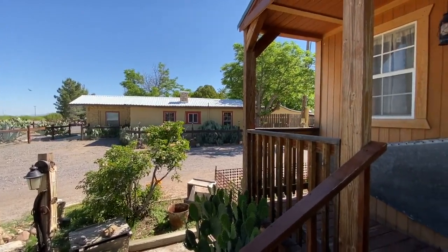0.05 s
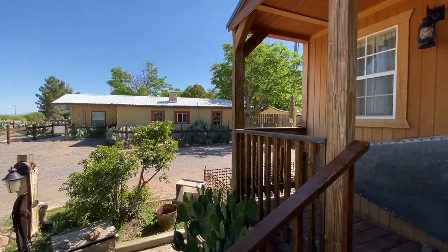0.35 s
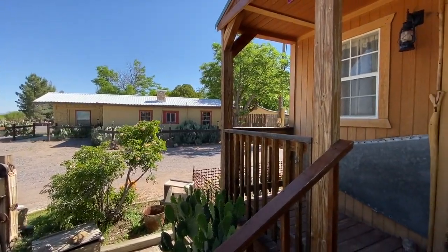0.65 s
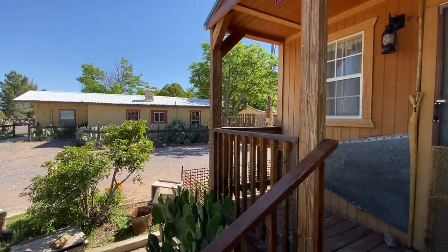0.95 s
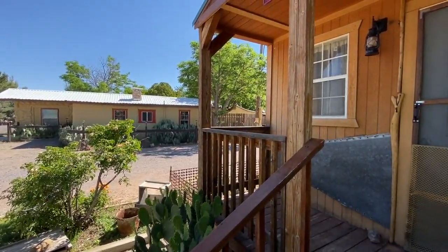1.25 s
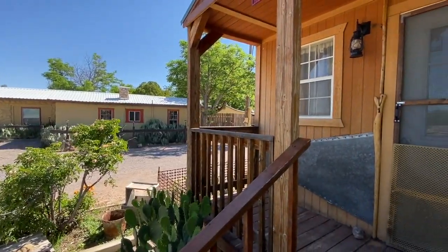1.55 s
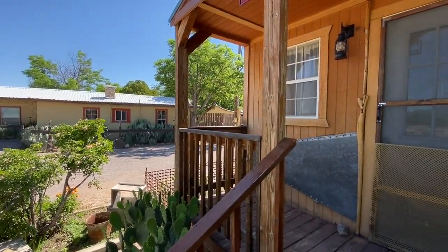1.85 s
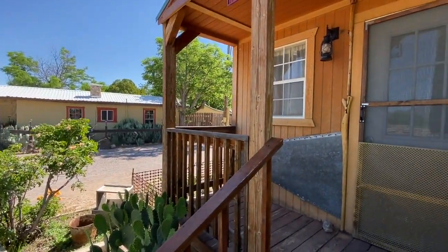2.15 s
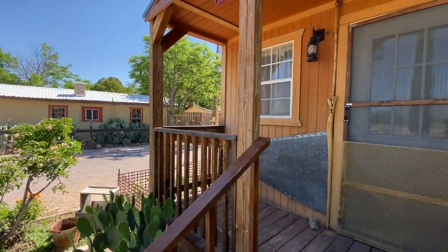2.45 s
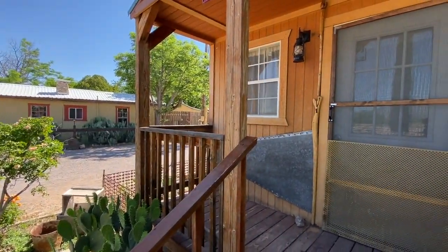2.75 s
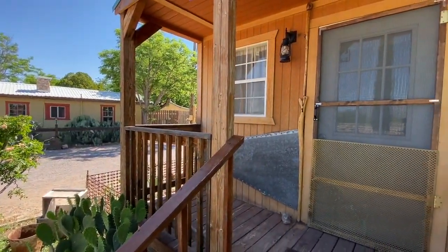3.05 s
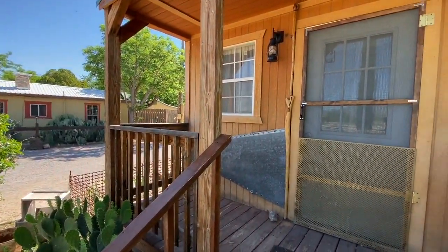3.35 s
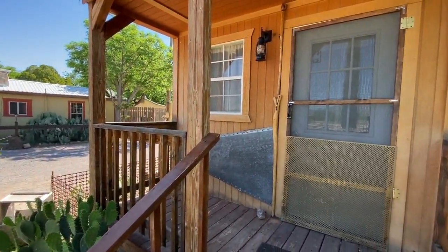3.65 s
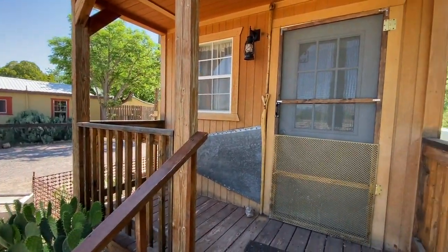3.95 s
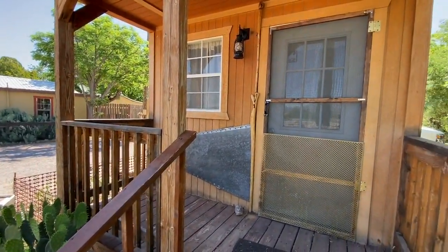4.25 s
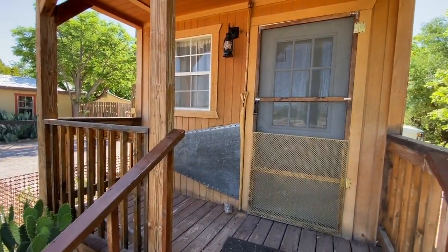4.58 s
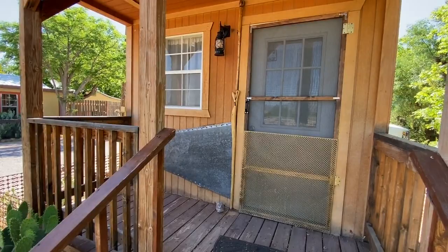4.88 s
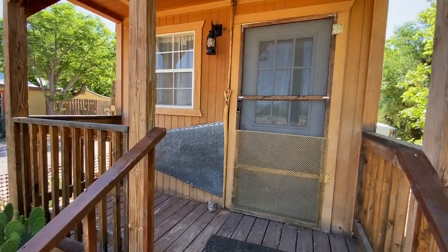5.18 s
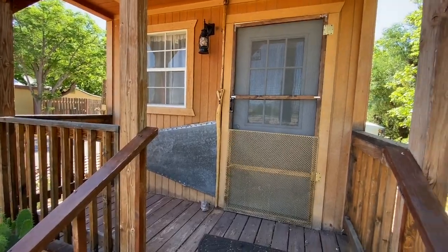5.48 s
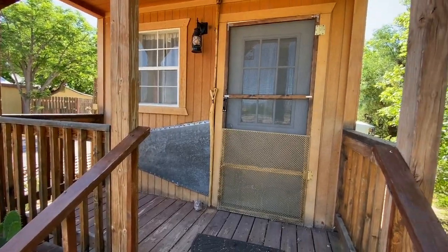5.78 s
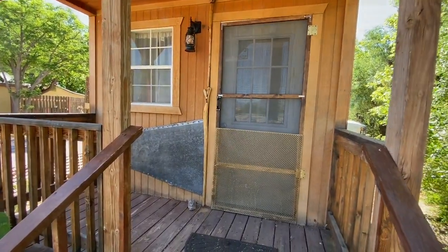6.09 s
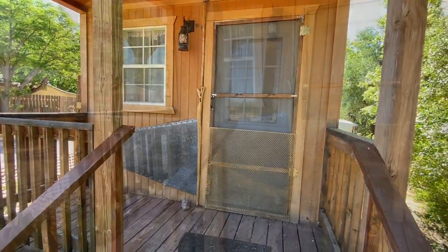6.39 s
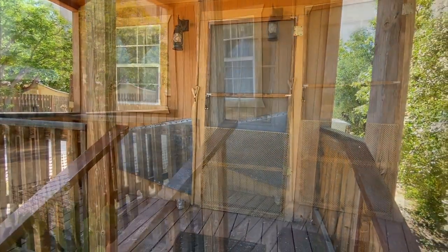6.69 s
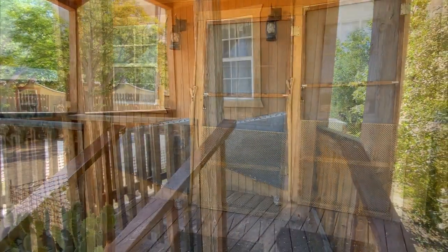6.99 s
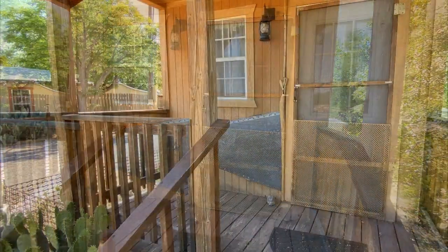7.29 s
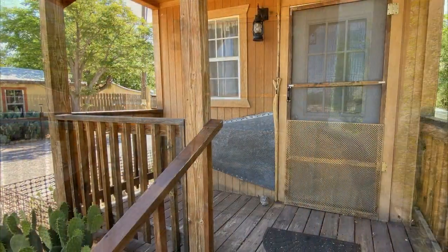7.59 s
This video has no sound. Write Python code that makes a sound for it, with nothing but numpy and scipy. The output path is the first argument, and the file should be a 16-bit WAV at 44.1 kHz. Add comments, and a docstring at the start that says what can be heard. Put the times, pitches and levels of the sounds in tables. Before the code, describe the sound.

Many small birds chirp outdoors above a soft low rumble, with a raspy chatter joining later before everything fades.

```python
"""Sparrows chirp and twitter in the bushes beside a wooden porch; one breaks into a dry scolding chatter.
Each note is a trilled syrinx tone on a pitch arch, echoed by porch, trees and walls. The scold is a
hoarse harmonic voice shaped by throat and beak. A dove coos far off, a light breeze rumbles on the
microphone over a dull outdoor murmur with a faint electric hum, and the scene fades away."""
import sys
import numpy as np
from scipy import signal
from scipy.io import wavfile

SR = 44100
rng = np.random.default_rng(int(sys.argv[2]) if len(sys.argv) > 2 else 0)


def unload_wav(signal):
    """Save mono or channel-first audio to the path in sys.argv[1] as 16-bit WAV at rate SR, clipped to [-1, 1]."""
    wavfile.write(
        sys.argv[1],
        SR,
        np.round(np.clip(np.atleast_2d(signal).T, -1, 1) * 32767).astype(np.int16),
    )


N = 340880
TIME_S = np.arange(N) / SR

# Table levels are relative; each source adds its own gain.
# nearest sparrow: t/s, f/Hz, main note/dB, closing note/dB, lisp/dB, buzz depth/ratio,
# second voice/dB re main note
NEAR_CHIRPS = [(0.56, 4955, -41, -51, -50.5, 0.053, -12), (1.161, 4820, -44.5, -51, -50, 0.052, -5),
               (1.94, 4764, -42.5, -52, -49.5, 0.032, -8), (2.656, 4790, -41, -47.5, -52, .11, -4),
               (3.189, 5020, -44.5, -54, -50.5, 0.029, -7), (3.831, 4804, -48, -54.5, -55.5, 0.081, -8),
               (4.372, 4840, -48.5, -56.5, -54, 0.045, -6.5), (5.04, 5080, -48, -59.5, -60.5, .06, -13),
               (5.954, 5080, -52, -58.5, -60, 0.05, -4)]
# flock calls: centre t/s, f/Hz, level/dB
CHEEP_CALLS = [(.028, 4930, -48.5), (.122, 3980, -55.5), (.265, 4660, -52.5), (.305, 5850, -53),
               (.347, 5810, -53.5), (.495, 5070, -49), (.76, 4840, -58.5), (1.03, 5070, -54.5),
               (1.375, 3330, -54.5), (1.547, 5180, -51), (1.75, 4590, -49), (2.215, 5640, -51),
               (2.315, 5150, -54.5), (2.378, 5260, -54.5), (2.487, 4970, -60.5), (2.555, 3400, -70),
               (2.858, 5380, -56.5), (3.578, 3445, -59.5), (3.76, 5400, -57), (3.825, 5790, -52),
               (4.165, 5140, -62.5), (4.97, 5570, -58.5), (5.205, 4950, -57.5), (5.29, 4160, -69),
               (5.53, 5560, -60), (5.585, 5600, -58.5), (6.11, 4600, -60), (6.17, 4400, -58.5),
               (6.48, 5210, -58.5), (6.578, 4630, -61), (6.7, 4706, -52.5), (6.773, 5030, -56),
               (6.955, 5560, -58.5), (6.995, 5650, -59), (7.105, 4970, -54), (7.262, 4000, -66)]  # hooked, up and down
TSIP_CALLS = [(0.934, 4840, -53), (1.454, 4926, -44.5), (1.885, 4830, -51.5), (3.404, 5180, -56.5),
              (3.655, 4860, -52), (5.764, 4710, -56), (6.244, 4560, -57.5)]  # thin lisp, then a sweep up to a held note
FALL_CALLS = [(0.374, 3160, -54), (.542, 3520, -50.5), (1.477, 2555, -62.5), (1.705, 6020, -49.5),
              (1.73, 4650, -54.5), (1.787, 3206, -47.5), (1.813, 4000, -50.5), (2.154, 4590, -57.5),
              (2.238, 4380, -60), (2.345, 3384, -58), (2.62, 5020, -56), (2.996, 5360, -58.5),
              (4.021, 4600, -56), (4.066, 3980, -54), (4.884, 3830, -59.5), (5.457, 4120, -63.5),
              (5.809, 5020, -57)]  # falling slurs
RISE_CALLS = [(0.066, 4110, -59), (1.005, 3920, -62), (1.513, 3600, -51), (1.716, 4900, -55),
              (4.226, 3794, -67.5), (4.505, 4880, -63), (4.565, 3790, -59), (5.059, 3520, -54.5),
              (5.51, 3550, -53.5), (5.846, 4030, -56.5), (6.32, 3940, -61)]  # rising slurs
FLOCK_CALLS = [*CHEEP_CALLS, *TSIP_CALLS, *FALL_CALLS, *RISE_CALLS]
# their syllables: centre delay/s, length/s, start/ratio, middle/ratio, end/ratio (to the call's f),
# arch bend, octave/dB, level/dB
CHEEP_SYLLABLES = [(0, .052, .68, 1.04, .72, 1.3, -22, 6), (.006, .036, .74, .9, .66, 1.5, -30, -3)]
TSIP_SYLLABLES = [(0, .052, .74, 1.0, .9, 3.5, -15, 4.5), (.004, .034, .66, .86, .62, 2, -20, -3),
                  (-.05, .058, 1.34, 1.42, 1.58, 2, -40, -8)]
FALL_SYLLABLES = [(0, .048, 1.13, 1.0, .85, 1.3, -33, 5)]
RISE_SYLLABLES = [(0, .036, .86, 1.0, 1.2, 1, -15, 4.5)]
# scolding rasps: t/s, level/dB, beak opening/ratio on the throat resonances, low resonance/dB
SCOLD_RASPS = [(4.509, -54, 1.28, 8), (4.575, -50.5, 1.28, 3.5), (4.64, -54, 0.98, 3),
               (4.731, -52.5, 0.96, 3), (4.81, -52.5, 1.05, 3.5), (4.905, -51, 1.01, 0),
               (4.997, -48.5, 1.02, 0), (5.084, -52.5, 1, 3), (5.213, -52, 1.1, 0.5),
               (5.32, -54, 1.025, 2.5), (5.471, -68, 0.73, 8), (5.676, -51.5, 1.15, -2.5),
               (5.741, -51, 1.1, 0), (5.825, -52.5, 1.23, 1), (6.148, -62.5, 1.63, 9),
               (6.229, -60, 1.17, 2.5), (6.301, -52, 1.17, 1), (6.376, -52, 1.08, 1),
               (6.479, -52.5, 1.18, 0.5), (6.556, -66, 0.66, 3), (6.659, -54.5, 1.38, -2),
               (6.835, -51, 1.18, -2.5), (6.916, -53, 1, 0), (7.005, -49, 1.17, -4)]
# throat response in a rasp: f/Hz, gain/dB
THROAT_RESPONSE = [(600, -26), (1150, -6), (1500, -14), (2000, -8), (2850, 1), (3400, -0.5), (4200, -6),
                   (5300, -10), (6500, -12.5), (8000, -23), (12000, -20)]
# burry down-slides: centre t/s, length/s, start f/Hz, end f/Hz, level/dB
CHURR_CALLS = [(0.084, 0.068, 4100, 3060, -46), (0.811, 0.14, 4200, 2640, -52),
               (1.619, 0.084, 4000, 3100, -58), (2.538, 0.082, 3600, 3080, -63),
               (3.048, .11, 4500, 2900, -45.5), (3.511, 0.087, 4400, 2950, -53.5),
               (3.69, 0.08, 4200, 3117, -51.5), (4.088, 0.089, 3920, 2684, -60)]
# close upsweeps: centre t/s, top f/Hz, level/dB
SWEEP_CALLS = [(0.064, 4690, -50), (0.912, 4600, -52.5), (2.183, 5650, -67), (2.295, 5200, -57),
               (2.36, 5450, -60.5), (2.455, 4960, -54), (3.38, 5200, -72), (3.644, 5000, -54),
               (4.146, 5100, -73.5), (5.745, 4620, -56), (6.236, 4890, -52)]
# close pips: t/s, f/Hz, level/dB
PIP_CALLS = [(1.024, 4830, -50.5), (2.373, 5280, -44.5), (4.216, 3650, -48.5), (5.723, 4750, -46),
             (6.695, 4550, -59)]
# nasal peeps: centre t/s, length/s, f/Hz, level/dB
PEEP_CALLS = [(7.215, .05, 3330, -49.5), (7.4, .085, 3360, -46)]
# partials of a peep: f/ratio, level/dB
NASAL_PARTIALS = [(.75, -23), (1, 0), (1.25, -13), (1.75, -18), (2, -16), (2.5, -21)]
# faint low tones under the chirps: centre t/s, f/Hz, level/dB
LOW_TONES = [(.28, 1405, -72), (0.789, 1320, -58.5), (1.468, 1500, -68.5), (1.61, 1495, -67),
             (2.089, 1413, -63.5), (2.271, 1364, -63), (3.21, 1500, -65.5), (3.35, 1505, -66.5)]
# dove: t/s, length/s, start f/Hz, middle f/Hz, end f/Hz, level/dB
DOVE_COOS = [(4.35, .11, 520, 735, 530, -70), (4.545, .07, 600, 740, 590, -69),
             (4.6, .065, 575, 560, 545, -67), (5.36, .14, 520, 700, 660, -74),
             (5.51, .12, 620, 570, 550, -72)]
# background levels: t/s, murmur/dB, distant flock/dB
AMBIENT_LEVELS = [(0, -63, -61), (1.8, -63, -53.5), (3.702, -63.5, -60), (4.3, -65, -63), (5.4, -68, -65),
                  (6.199, -69, -59), (7.397, -67.5, -58)]
# air on the microphone: t/s, level/dB
BREEZE_LEVELS = [(0, -68), (2, -58), (2.7, -73), (4.3, -81), (5.5, -92)]
GUST_PEAKS = [(.02, -52.5), (0.459, -46.5), (.59, -49.5), (.94, -47.5), (1.27, -53), (1.42, -48.5),
              (1.72, -48), (1.99, -52), (2.33, -58.5), (3.41, -63)]
# noise spectra: f/Hz, density/dB
LOW_VOICES_SPECTRUM = [(1500, -21.5), (2300, -16), (3100, -9), (4300, -6), (6000, -22.5)]
HIGH_VOICES_SPECTRUM = [(3000, -17.5), (4400, 2.5), (6000, -3), (7800, -3), (10000, -22.5), (14000, -55.5)]
WIND_SPECTRUM = [(20, -38), (35, -14.5), (58, -1.5), (85, -13), (130, -28.5), (250, -37.5)]
MURMUR_SPECTRUM = [(40, 4), (120, -2.5), (170, -4.5), (320, 2), (550, -5.5), (750, -4.5), (1000, -6.5),
                   (2000, -36), (4000, -7.5), (9000, -33), (15000, -42.5)]
# electric hum: f/Hz, level/dB
HUM_PARTIALS = [(120, -74), (360, -86.5)]


def near_sparrow(gain_db=3.5, buzz_hz=190):
    """Repeated chirp: high lisp, buzzing note from both sides of the syrinx, closing hook."""
    out = np.zeros(N)

    def note(t, db, *shape, buzz=.06, bend=2):
        tone = whistle(*shape, bend=bend, jitter=.03, trill=buzz, trill_hz=buzz_hz, edge=.55,
                       third_db=-30, air_db=-30)
        add(out, t, from_db(db) * tone)

    for t, hz, main_db, close_db, lisp_db, buzz, second_db in NEAR_CHIRPS:
        dive, sag, flick, rise = rng.uniform([.52, .7, .92, .66], [.72, .88, 1.08, .82])
        # lisp
        note(t - .095, lisp_db - 8, .047, 4700, 6250, 6100, buzz=.058)
        note(t - .05, lisp_db, .068, 5500, 6150, 6250, buzz=.05)
        note(t - .015, lisp_db - 1, .05, 6100, 5700, 1.05 * hz, buzz=.09)
        # upsweep, held note
        note(t - .006, main_db - 9, .045, .7 * hz, .86 * hz, 1.02 * hz, buzz=.11, bend=1)
        note(t + .012, main_db + .5, .07, rise * hz, 1.02 * hz, sag * hz, buzz=buzz, bend=3.5)
        # second side, above and below
        note(t + .024, main_db + second_db, .055, .95 * hz, 1.12 * hz, .98 * hz, buzz=buzz)
        note(t + .011, main_db - 12, .1, .56 * hz, .88 * hz, dive * hz)
        note(t - .005, main_db - 21, .09, 3300, 2950 * flick, 3100, buzz=.08)
        # hook
        note(t + .075, close_db - 2.5, .085, 5300, 5600, 5000)
        note(t + .099, close_db - 2.5, .055, 3100 * flick, 3900 * flick, 5200, buzz=.09, bend=.97)
        note(t + .102, close_db - 2.5, .05, 3700, 5000 * flick, 3700, buzz=buzz, bend=1.2)
    return from_db(gain_db) * yard(out, left_db=5.5, early_db=1, tail_db=-4.5, early_t60_s=.1)


def flock(lisp_hz=6070, lisp_lead_s=.06, lisp_above_hz=4650):
    """Varied calls from three perches, each with its own echoes; high cheeps open with a lisp."""
    perches = np.zeros((3, N))
    for calls, syllables in [(CHEEP_CALLS, CHEEP_SYLLABLES), (TSIP_CALLS, TSIP_SYLLABLES),
                             (FALL_CALLS, FALL_SYLLABLES), (RISE_CALLS, RISE_SYLLABLES)]:
        for k, (t, hz, db) in enumerate(calls):
            for delay_s, length_s, start, middle, end, bend, octave_db, syllable_db in syllables:
                stretch, opening, closing = np.exp(rng.uniform(-1, 1, 3) * [.15, .07, .07])
                length_s *= stretch
                arch_hz = hz * start * opening, hz * middle, hz * end * closing
                note = whistle(length_s, *arch_hz, bend=bend, jitter=.018, trill=.035, trill_hz=85,
                               octave_db=octave_db, third_db=-40, air_db=-38)
                add(perches[k % 3], t + delay_s - length_s / 2, from_db(db + syllable_db) * note)
    for k, (t, cheep_hz, db) in enumerate(CHEEP_CALLS):
        hz = lisp_hz * rng.uniform(.94, 1.06)
        lisp = whistle(.043, hz, hz, 1.08 * hz, jitter=.035, trill=.04, trill_hz=420,
                       octave_db=-36, air_db=-28)
        if cheep_hz > lisp_above_hz:
            add(perches[k % 3], t - lisp_lead_s, from_db(db - 5.5) * lisp)
    return sum(yard(perch, early_db=-1.5, tail_db=-8) for perch in perches)


def scold(length_s=.05, pitch_hz=570, whistle_hz=3060, hoarse_db=4, gain_db=3):
    """Hoarse voiced rasps, a whistle in each; throat resonances move as the beak opens and shuts."""
    out = np.zeros(N)
    harmonics = np.arange(1, 21)[:, None]
    for t, db, beak, low_db in SCOLD_RASPS:
        size = int(length_s * rng.uniform(.9, 1.1) * SR)
        hz = pitch_hz * arch(size, .86, 1.04, .8) * (rng.uniform(.8, 1.2) + .14 * wander(size, 1100))
        opening = beak * arch(size, .9, 1.04, .9)
        throat_db = np.interp(harmonics * hz / opening, *np.transpose(THROAT_RESPONSE))
        shelf_db = np.interp(harmonics * hz, [1600, 2400], [low_db, 0])
        cycles = harmonics * np.cumsum(hz) / SR + rng.random(harmonics.shape)
        voice = np.sum(from_db(throat_db + shelf_db) * np.sin(2 * np.pi * cycles), axis=0)
        hoarse = unit_rms(voice * from_db(hoarse_db * wander(size, 900)))
        envelope = signal.windows.tukey(size, .85) * from_db(np.linspace(2.5, -3, size))
        add(out, t - .005, from_db(db) * hoarse * envelope)
        top_hz = whistle_hz * beak * rng.uniform(.9, 1.15)
        note = whistle(.03, .85 * top_hz, top_hz, .87 * top_hz, third_db=-26, air_db=-35)
        add(out, t + .002, from_db(db - 5) * note)
    return from_db(gain_db) * yard(out, early_db=0, tail_db=-7)


def churrs(gain_db=1):
    """Both sides of the syrinx slide down together, slightly apart and trilled."""
    out = np.zeros(N)
    for t, length_s, start_hz, end_hz, db in CHURR_CALLS:
        for ratio, side_db in [(1, 0), (1.14, -6)]:
            arch_hz = ratio * np.array([start_hz, np.sqrt(start_hz * end_hz), end_hz])
            note = whistle(length_s, *arch_hz, bend=1, trill=.04, trill_hz=150, edge=.7,
                           octave_db=-33, third_db=-42, air_db=-42)
            add(out, t - length_s / 2, from_db(db + side_db) * note)
    return from_db(gain_db) * yard(out, early_db=1, tail_db=-7)


def sweeps(length_s=.03):
    """Clean upward glides: strong octave, little echo."""
    out = np.zeros(N)
    for t, hz, db in SWEEP_CALLS:
        note = whistle(length_s, .6 * hz, .86 * hz, hz, bend=1, jitter=.01, edge=.5,
                       octave_db=-14, third_db=-42, air_db=-42)
        add(out, t - length_s / 2, from_db(db) * note)
    return yard(out, early_db=-4, tail_db=-10)


def pips(length_s=.02):
    """Clean, abrupt notes with little echo."""
    out = np.zeros(N)
    for t, hz, db in PIP_CALLS:
        note = whistle(length_s, .93 * hz, hz, 1.02 * hz, jitter=.008,
                       octave_db=-30, third_db=-45, air_db=-40)
        add(out, t, from_db(db) * note)
    return yard(out, early_db=-6, tail_db=-12)


def peeps(gain_db=2):
    """Nasal notes that slide up and level off: stacked partials, one dominant."""
    out = np.zeros(N)
    for t, length_s, pitch_hz, db in PEEP_CALLS:
        for ratio, partial_db in NASAL_PARTIALS:
            hz = ratio * pitch_hz
            note = whistle(length_s, .88 * hz, hz, .96 * hz, bend=4, jitter=.012, edge=.7, air_db=-23)
            add(out, t - length_s / 2, from_db(db + partial_db + gain_db) * note)
    return yard(out, early_db=-3, tail_db=-13)


def low_tones(length_s=.07, gain_db=-2):
    """Faint, rough low tones near 1.4 kHz under the chirps, mostly echo."""
    out = np.zeros(N)
    for t, hz, db in LOW_TONES:
        note = whistle(length_s, 1.09 * hz, hz, .85 * hz, jitter=.14, trill=.1, edge=.7,
                       octave_db=2, third_db=-3, air_db=-40)
        add(out, t - length_s / 2, from_db(db + gain_db) * note)
    return yard(out, left_db=2, early_db=5, tail_db=2, t60_s=.4)


def neighbours(birds=4, gain_db=-7.5, pull_to_hz=4250):
    """Birds deeper in the bushes join each flock call with small hooked notes."""
    out = np.zeros(N)
    for t, call_hz, db in FLOCK_CALLS:
        for lag, detune, slope, stretch in rng.uniform(-1.2, 1, (birds, 4)):
            hz = np.sqrt(pull_to_hz * call_hz) * np.exp(.22 * detune)
            arch_hz = hz * (.8 + .14 * slope), hz, hz * (.8 - .14 * slope)
            length_s = .032 + .01 * stretch
            note = whistle(length_s, *arch_hz, bend=1.4, jitter=.022, trill=.03, trill_hz=70,
                           octave_db=-27, third_db=-45, air_db=-48)
            add(out, t + .018 * lag - length_s / 2, from_db(db + gain_db) * note)
    return yard(out, left_db=3, early_db=-1, tail_db=-7)


def twitter(notes_per_s=34, low_hz=3250, high_hz=4800, gain_db=2.5, spread_db=2):
    """Random far warbles that follow the distant flock's level; distance takes their overtones."""
    out = np.zeros(N)
    times_s, _, flock_db = np.transpose(AMBIENT_LEVELS)
    for k, (lag, pitch, slope, strength) in enumerate(rng.random((int(notes_per_s * N / SR), 4))):
        t = (k + lag) / notes_per_s
        hz = low_hz * (high_hz / low_hz) ** pitch
        glide = np.exp(.5 * (slope - .5))
        db = np.interp(t, times_s, flock_db) + gain_db + spread_db * (2 * strength - 1)
        note = whistle(.022 + .02 * strength, .93 * hz * glide, hz, .93 * hz / glide, bend=1.2,
                       jitter=.03, trill=.05, trill_hz=90, octave_db=-33, third_db=-50, air_db=-45)
        add(out, t, from_db(db) * note)
    return yard(out, left_db=2.5, early_db=1, tail_db=-4, t60_s=.3)


def dove(gain_db=7.5):
    """Soft, breathy hoots from far off, blurred by echoes."""
    out = np.zeros(N)
    for t, length_s, *arch_hz, db in DOVE_COOS:
        add(out, t, from_db(db) * whistle(length_s, *arch_hz, jitter=.09, edge=.5))
    return from_db(gain_db) * yard(out, left_db=0, early_db=1, tail_db=-2, t60_s=.5, early_t60_s=.1)


def distant_flock(split_hz=4400, swell_s=.12):
    """Far voices blurred to noise: low and high bands swell with the calls; the low one persists."""
    _, flock_db = curves(AMBIENT_LEVELS)
    low_power, high_power = from_db(flock_db - 6) ** 2, np.zeros(N)
    swell = np.hanning(int(swell_s * SR))
    for t, hz, db in FLOCK_CALLS:
        power, answer_db = (high_power, -10) if hz > split_hz else (low_power, -9.5)
        add(power, t - swell_s / 2, from_db(db + answer_db) ** 2 * swell)
    low = np.sqrt(low_power) * band_noise(LOW_VOICES_SPECTRUM, correlation=.4, flicker_db=2)
    high = np.sqrt(high_power) * band_noise(HIGH_VOICES_SPECTRUM, correlation=.4, flicker_db=2)
    return pan(3) * (low + high)


def wind(rise_db_per_s=237, fall_db_per_s=73):
    """Air rumbles on the microphone ports; each gust swells fast and decays into the breeze."""
    gusts_db = [db - np.maximum(rise_db_per_s * (t - TIME_S), fall_db_per_s * (TIME_S - t))
                for t, db in GUST_PEAKS]
    level_db = np.max([*gusts_db, *curves(BREEZE_LEVELS)], axis=0)
    return from_db(level_db) * band_noise(WIND_SPECTRUM, correlation=.11, flicker_db=5) * pan(8)


def murmur(left_delay_s=.0005, gain_db=2):
    """Dull outdoor noise from the right; a faint electric hum follows its level."""
    level_db, _ = curves(AMBIENT_LEVELS)
    left, right = band_noise(MURMUR_SPECTRUM, correlation=.6, flicker_db=1)
    from_right = np.array([np.roll(left, round(left_delay_s * SR)), right]) * pan(-2.5)
    hum = sum(np.sqrt(2) * from_db(db) * np.sin(2 * np.pi * hz * TIME_S) for hz, db in HUM_PARTIALS)
    return from_db(level_db + gain_db) * from_right + from_db(level_db - level_db.max()) * hum


def whistle(length_s, start_hz, middle_hz, end_hz, bend=2, jitter=.038, trill=0, trill_hz=300,
            edge=.6, octave_db=-24, third_db=-33, air_db=-25):
    """Syrinx tone on a pitch arch, with overtones and air noise; jitter and trill are pitch fractions."""
    size = max(int(length_s * SR), 64)
    trill_cycles = np.cumsum(trill_hz * (1 + .14 * wander(size, 161))) / SR + rng.random()
    hz = arch(size, start_hz, middle_hz, end_hz, bend)
    hz *= 1 + jitter * wander(size, 925.7) + trill * np.sin(2 * np.pi * trill_cycles)
    phase = 2 * np.pi * np.cumsum(hz) / SR
    octave = from_db(octave_db + np.linspace(.75, -.75, size)) * np.sin(2 * phase)
    third = from_db(third_db) * np.sin(3 * phase) * (hz < SR / 6)  # muted above Nyquist
    air = from_db(air_db) * np.resize(rng.standard_normal(8192), size)
    envelope = signal.windows.tukey(size, edge) * from_db(1.8 * wander(size, 200))
    return np.sqrt(2) * (np.sin(phase) + octave + third + air) * envelope


def yard(x, early_db, tail_db, left_db=3.5, t60_s=.26, early_t60_s=.08, echoes_per_s=2500):
    """Direct sound, left port first; scattered porch echoes; tail from trees and walls."""
    t = np.arange(SR * 3 // 4) / SR
    echoes = rng.standard_normal((2, len(t))) * (rng.random((2, len(t))) < echoes_per_s / SR)
    early = echoes * (t > .001) * from_db(-60 * t / early_t60_s)
    tail = rng.standard_normal((2, len(t))) * np.minimum(t / .025, 1) * from_db(-60 * t / t60_s)
    response = (from_db(early_db) * unit_rms(early) + from_db(tail_db) * unit_rms(tail)) / np.sqrt(len(t))
    response[0, 0] += 1
    response[1, round(.00043 * SR)] += 1
    response /= np.sqrt(np.sum(response ** 2) / 2)
    return pan(left_db) * signal.fftconvolve(x[None], response, axes=1)[:, :N]


def band_noise(spectrum, correlation, flicker_db):
    """Stereo noise in independently flickering half-octave bands; rms 1."""
    hz, db = np.transpose(spectrum)
    edges_hz = 20 * 2 ** np.arange(0, 10.1, .5)
    white = rng.standard_normal((2, 2, N))
    out = np.zeros((2, N))
    for k, (low_hz, high_hz) in enumerate(zip(edges_hz, edges_hz[1:])):
        if high_hz > hz[0] and low_hz < hz[-1]:
            bandpass = signal.butter(2, [low_hz, high_hz], "band", fs=SR, output="sos")
            mid, side = signal.sosfilt(bandpass, white[k % 2])
            stereo = np.sqrt(1 + correlation) * mid + np.sqrt(1 - correlation) * side * [[1], [-1]]
            band_db = np.interp(np.log(low_hz * high_hz) / 2, np.log(hz), db)
            out += from_db(band_db + flicker_db * wander(N, 20)) * stereo
    return unit_rms(out)


def arch(size, start, middle, end, bend=2):
    """Start to middle to end: pointed at bend 1, round at 2, flat-topped above."""
    u = np.linspace(-1, 1, size)
    return middle + (np.where(u < 0, start, end) - middle) * np.abs(u) ** bend


def wander(size, rate_hz):
    """Interpolated random values, spread about 1."""
    return np.interp(np.arange(size) * rate_hz / SR, np.arange(2048), rng.standard_normal(2048))


def curves(rows):
    """Each column after t/s, interpolated per sample."""
    times_s, *columns = np.transpose(rows)
    return [np.interp(TIME_S, times_s, column) for column in columns]


def add(track, start_s, sound):
    """Mix in place."""
    at = max(int(start_s * SR), 0)
    track[at:at + len(sound)] += sound[:N - at]


def pan(left_db):
    """Stereo gains for a left-minus-right level."""
    return from_db(np.array([[left_db], [-left_db]]) / 2)


def from_db(db):
    return 10 ** (np.asarray(db) / 20)


def unit_rms(x):
    return x / np.sqrt(np.mean(x ** 2) + 1e-20)


def scene():
    """Birds over murmur and wind."""
    chorus = near_sparrow() + flock() + churrs() + sweeps() + pips() + peeps() + low_tones() + scold()
    return chorus + neighbours() + twitter() + distant_flock() + dove() + murmur() + wind()


def record(dry, port_hz=9500, notch_hz=12100, cutoff_hz=15200, fade_s=2, silent_at_s=7.5):
    """The right port rings in the treble, the left dips there; then notch, fade-out and low-pass."""
    ringing = signal.lfilter(*signal.iirpeak(port_hz, Q=4, fs=SR), dry)
    ported = dry + ringing * (from_db([[-3], [6]]) - 1)
    notched = signal.lfilter(*signal.iirnotch(notch_hz, Q=4, fs=SR), ported)
    faded = notched * np.clip((silent_at_s - TIME_S) / fade_s, 0, 1)
    return signal.sosfilt(signal.ellip(10, .2, 80, cutoff_hz, fs=SR, output="sos"), faded)


dry = scene()
out = record(dry)
unload_wav(out)
```